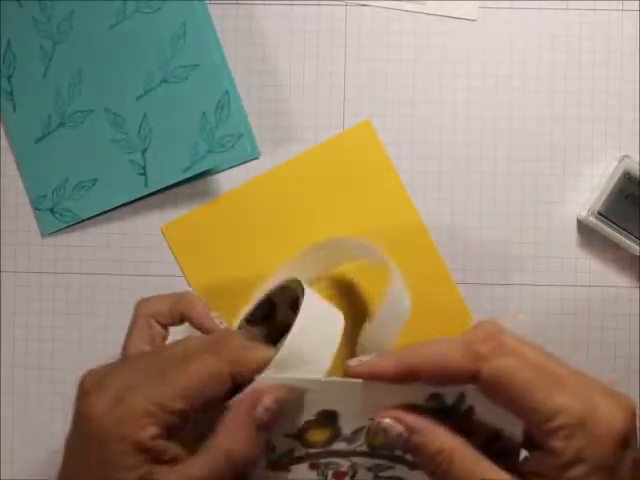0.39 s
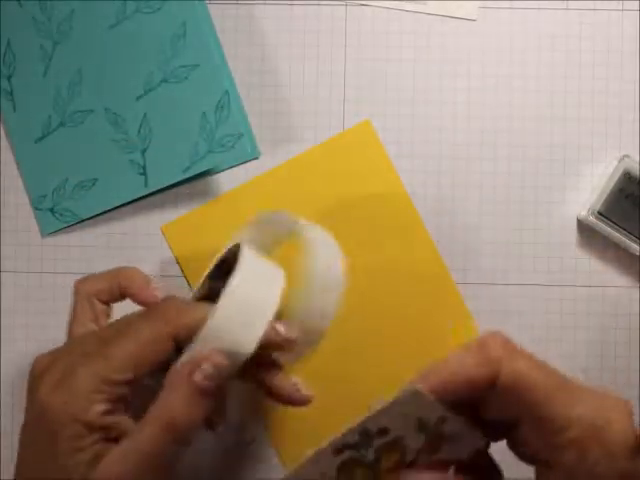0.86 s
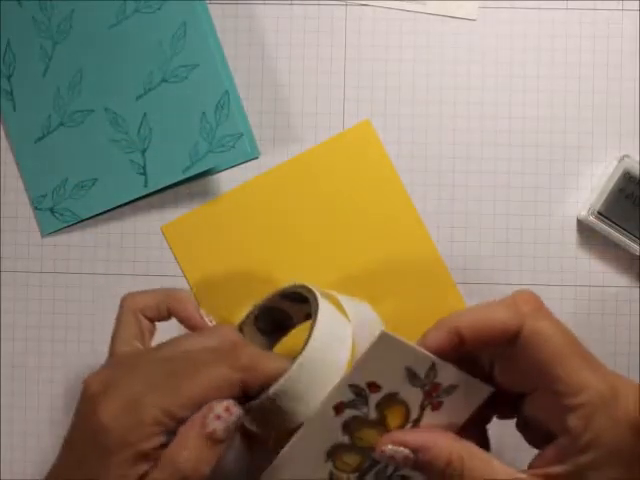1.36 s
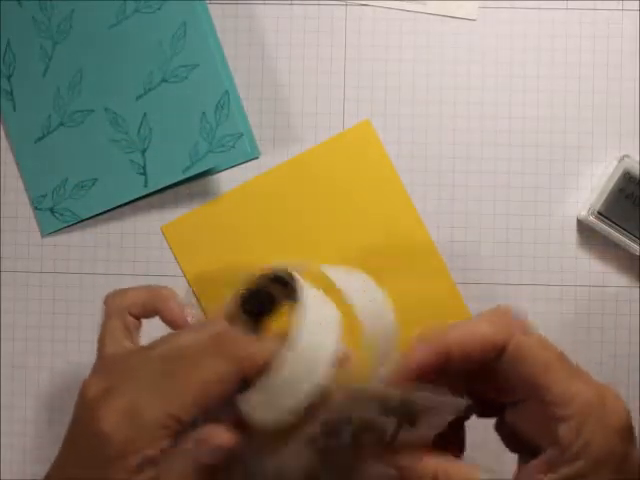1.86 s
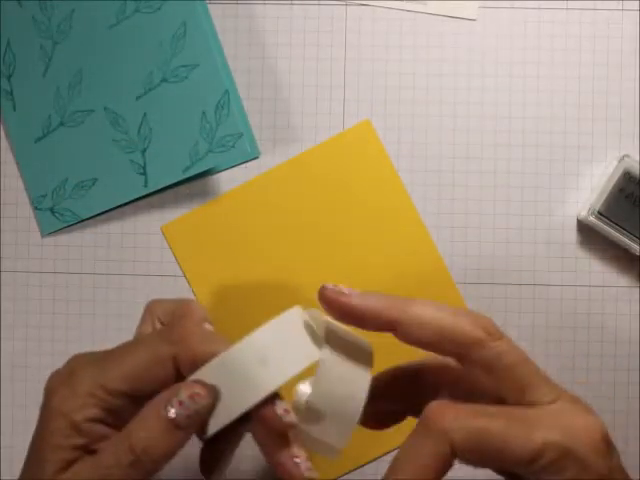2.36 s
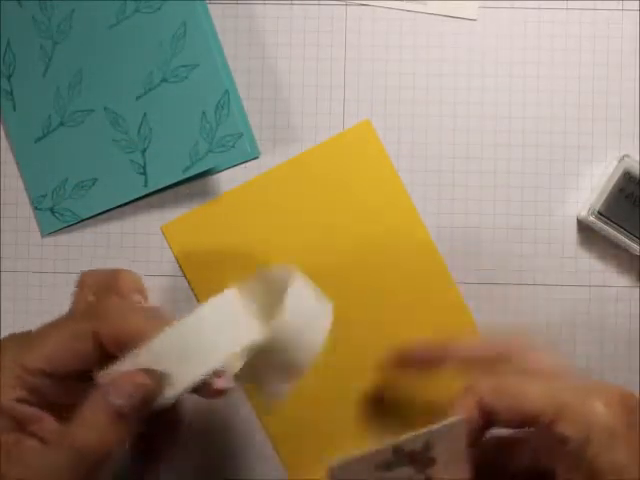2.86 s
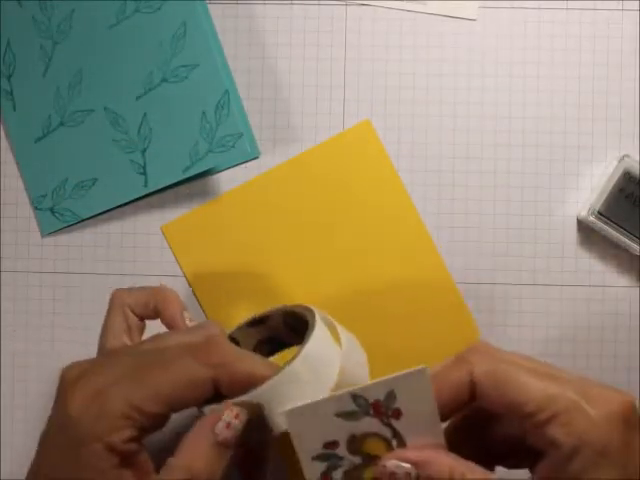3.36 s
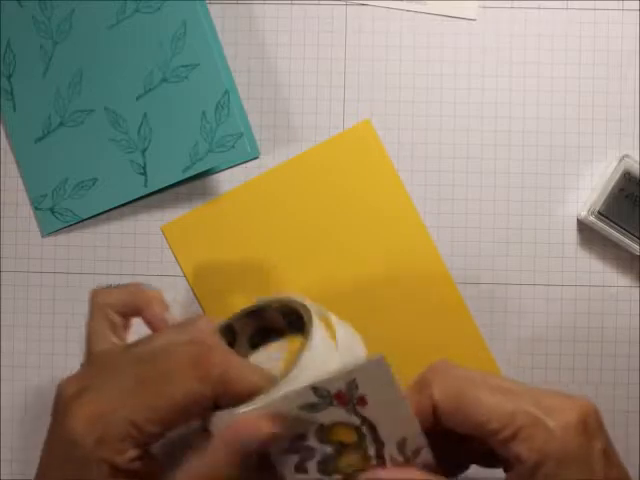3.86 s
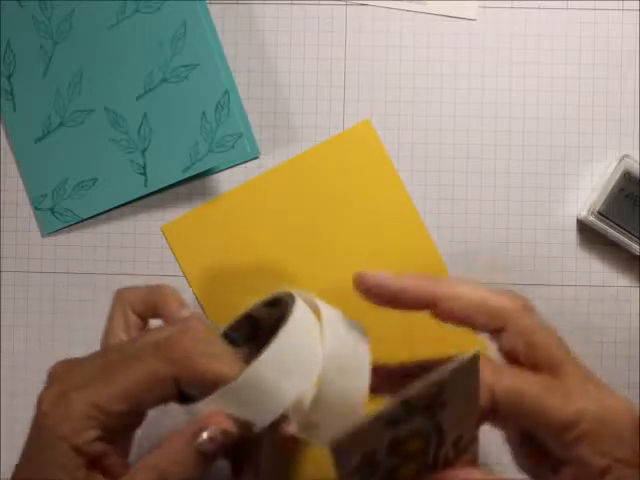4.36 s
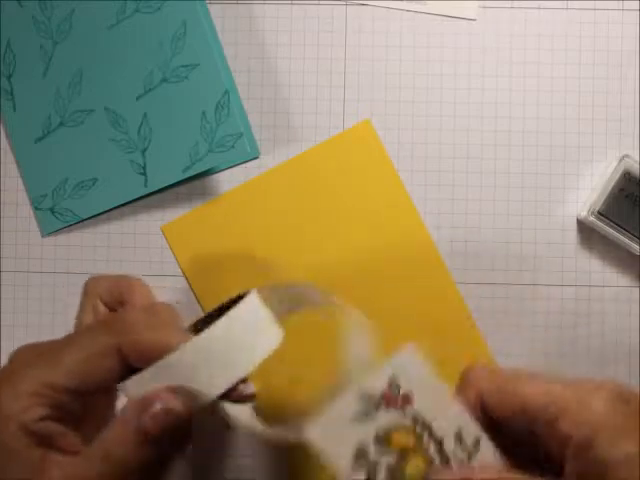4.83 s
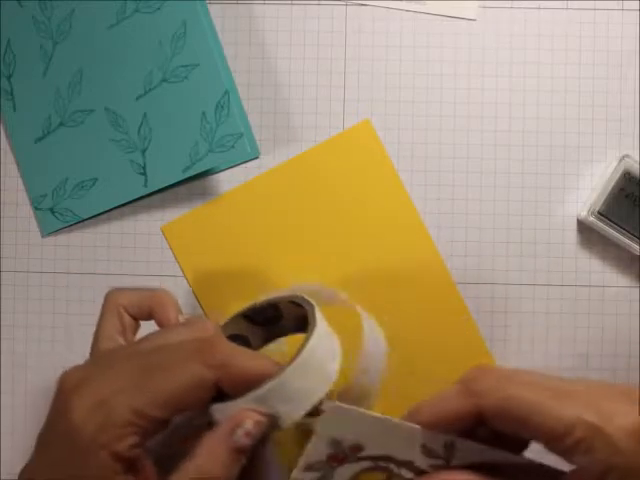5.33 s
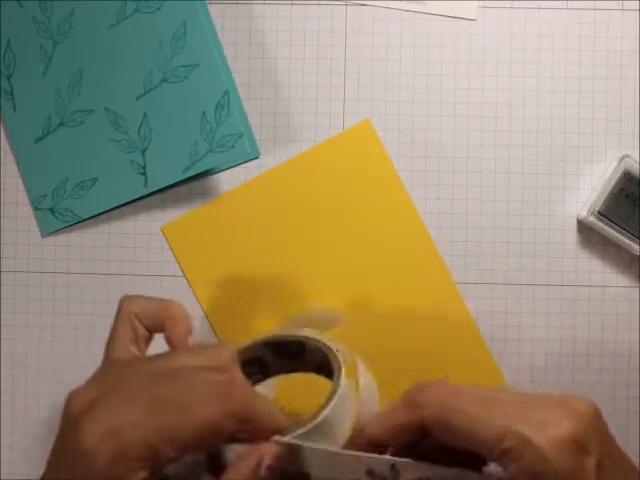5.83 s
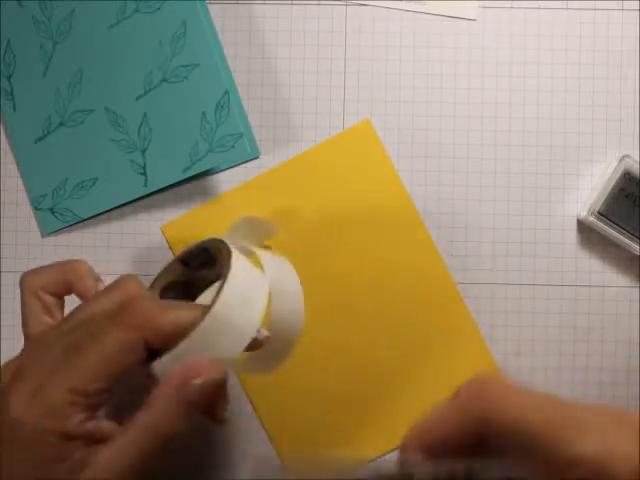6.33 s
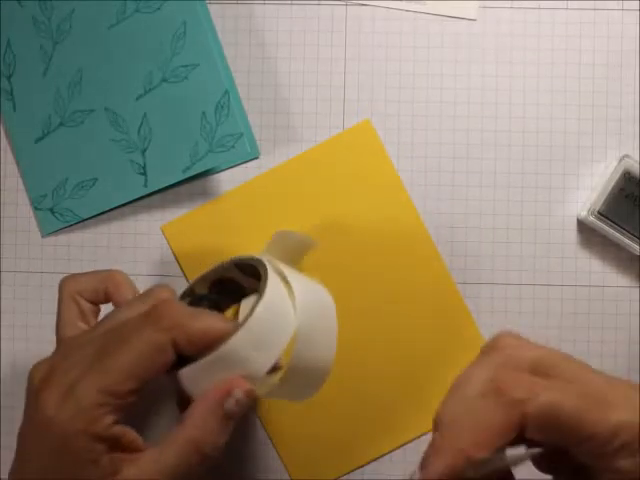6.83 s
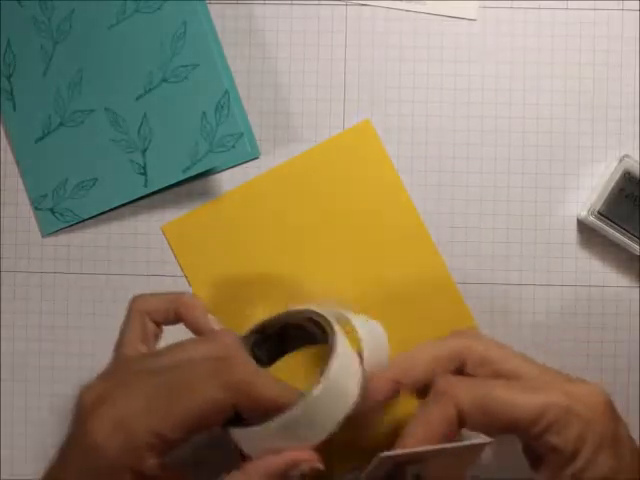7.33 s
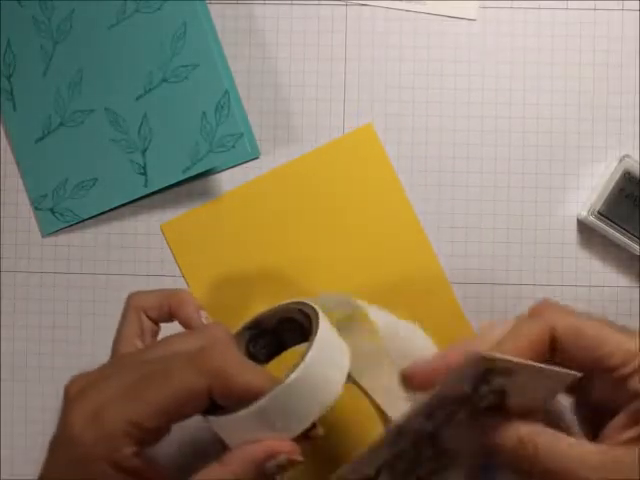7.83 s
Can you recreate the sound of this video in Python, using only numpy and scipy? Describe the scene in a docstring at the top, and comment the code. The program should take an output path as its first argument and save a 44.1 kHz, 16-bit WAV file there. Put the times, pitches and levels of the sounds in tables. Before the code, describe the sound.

Close to the microphone, hands press a small card onto sticky dots on a roll and pull it off. Irregular sharp snaps ring briefly through the stiff card, a few very loud, most faint. The springy backing strip adds tiny bright ticks and short papery rustles. The room is quiet, with soft hum and hiss.

```python
"""The soft hum and hiss of a quiet room, then hands press a card onto glue dots and pull it off again. Each dot
lets go with a snap: a short click, then decaying noise rung through the modes of the card. The loose backing
strip ticks as a fainter, brighter snap, and rustles in swells as random creases and hiss through paper-coloured
bands. Shaped noise and low resonances make the room."""
import sys
import numpy as np
from scipy import signal
from scipy.fft import rfft, irfft
from scipy.io import wavfile

SR = 44100
rng = np.random.default_rng(int(sys.argv[2]) if len(sys.argv) > 2 else 0)


def gain_from_decibels(decibels):
    """Convert decibel values to linear amplitude factors."""
    exponent = np.asarray(decibels, float) / 20
    return 10 ** exponent


def put_to_file(sound):
    """Save the sound as 16-bit audio at rate SR, in the file named by the first command-line argument."""
    columns = np.atleast_2d(sound).T  # one column per channel
    safe = np.clip(columns, -1, 1)
    whole_steps = np.round(safe * 32767)
    wavfile.write(sys.argv[1], SR, whole_steps.astype(np.int16))


N = 361179


def rms_one(x):
    """Scales x to rms 1."""
    return x / np.sqrt(np.mean(x ** 2) + 1e-20)


def in_time(rows):
    """Draws a curve of (t/s, level/dB) rows out to one value per sample."""
    s, level_db = np.transpose(rows)
    return np.interp(np.arange(N) / SR, s, level_db)


def coloured(x, spectrum):
    """Gives x the spectrum of an (f/Hz, level/dB) table, joined up along log frequency."""
    hz, db = np.transpose(spectrum)
    bins = np.maximum(np.fft.rfftfreq(len(x), 1 / SR), 1)
    gain = gain_from_decibels(np.interp(np.log(bins), np.log(hz), db))
    return irfft(rfft(x) * gain, len(x))


def drift(rate_hz):
    """Slow random wander of rms 1: noise through two equal low-pass poles, made at SR / 40."""
    r = np.exp(-80 * np.pi * rate_hz / SR)
    noise = rng.standard_normal(N // 40 + 2002)
    slow = signal.lfilter([1], [1, -2 * r, r * r], noise)[2000:]   # settled part only
    return np.interp(np.arange(N) / 40, np.arange(len(slow)), rms_one(slow))


def resonance(x, hz, width_hz):
    """Two-pole resonance with gain about 1 on top."""
    r = np.exp(-np.pi * width_hz / SR)
    top = (1 - r * r) / 2
    poles = [1, -2 * r * np.cos(2 * np.pi * hz / SR), r * r]
    return signal.lfilter([top, 0, -top], poles, x)


def cut(x, hz, kind):
    """Gentle low-, high- or band-pass."""
    return signal.sosfilt(signal.butter(2, hz, kind, fs=SR, output="sos"), x)


# glue dots letting go and the card knocking: t/s, level/dB, then levels/dB relative to that:
# knock of the roll, ring of the card, crack
SNAPS = [(0.428, -15.5, -14.5, -19.5, -21), (0.6512, -32, -20, -29, -14), (0.738, -6, -20, -19, -17.5),
         (0.7558, -24.5, -13, -32, -12), (0.8122, -29, -20, -18, -18), (1.6264, -22.5, -9, -15.5, -23),
         (1.8482, -31.5, -14, -21, -15), (1.9073, -2.3, -16, -12, -20.5), (2.6337, -25, -35, -35, -34),
         (2.681, -19.5, -20.5, -21.5, -12), (2.7981, -34, -34, -20, -9), (2.923, -25, -19, -17, -18),
         (2.944, -21, -28, -20, -15), (3.6425, -29.5, -12, -9.5, -15.5), (3.8755, -19.5, -27, -29.5, -23),
         (4.0032, -0.1, -23.5, -21.5, -22.5), (4.52, -30, -25, -21, -20), (4.562, -24.5, -37, -15, -25),
         (4.6833, -24.5, -27, -21.5, -16), (4.7407, -1, -37.5, -32.5, -23.5),
         (4.8023, -15, -23, -22.5, -17), (4.9384, -32, -13, -10.5, -14), (4.9577, -20.5, -24, -20, -15),
         (4.9967, -30.5, -18.5, -19, -20), (5.118, -6.5, -27.5, -19, -21.5), (5.234, -25, -22, -11, -21),
         (5.2613, -30, -31, -18, -22), (5.3059, -18, -31, -28, -22), (5.4022, -31.5, -22, -35, -11),
         (5.7525, -19.5, -13.5, -15.5, -24), (6.02, -28.5, -25, -24, -21.5), (6.1362, -14, -26, -24, -24),
         (6.1741, -19, -14.5, -17, -32), (6.192, -26.5, -9.5, -12.5, -18), (7.3416, -24, -31, -15.5, -15),
         (7.3603, -16.5, -20, -25, -25), (7.8627, -10.5, -27, -27, -19.5), (7.965, -18, -14, -18.5, -21),
         (7.983, -23.5, -29, -23, -13), (8.1279, -23.5, -18.5, -19.5, -25),
         (8.1535, -26.5, -29, -26, -16.5)]
# the springy strip ticking against roll and card: t/s, level/dB
TICKS = [(1.098, -35), (1.139, -44), (1.1697, -44), (1.7627, -44), (2.084, -41), (2.8265, -36.5),
         (3.243, -43), (3.336, -43.5), (4.195, -43.5), (4.844, -34.5), (5.075, -44), (5.3695, -40.5),
         (5.4656, -46), (5.8155, -38.5), (5.859, -41), (6.074, -41), (6.1053, -40), (6.3758, -40),
         (7.4231, -37), (7.4932, -42.5), (7.5393, -39), (7.5732, -32.5), (7.6897, -40), (7.7092, -36),
         (7.824, -38.5), (7.917, -34), (8.0267, -35.5)]
# make-up of every tick: knock, ring, crack [level/dB relative to the tick]
TICK_PARTS_DB = (-21, -18.5, -7.5)
# borders between thump, knock, ring and crack: f/Hz
PART_EDGES_HZ = [100, 650, 1700, 4000]


def snaps():
    """A sharp release, then a dense swarm of after-clicks and table echoes, the treble dying first."""
    t = np.arange(SR // 6) / SR
    out = np.zeros(N + len(t))
    click = release_click(t)
    ticks = [(*tick, *TICK_PARTS_DB) for tick in TICKS]
    for s, level_db, knock_db, ring_db, crack_db in SNAPS + ticks:
        parts_db = [knock_db - 4.5, knock_db, ring_db, crack_db]   # the thump follows the knock
        swarm = dying_swarm(t)
        body = card_body(swarm[:3])
        bands = zip(PART_EDGES_HZ, PART_EDGES_HZ[1:])
        parts = [cut(x, band, "band") for x, band in zip(body, bands)]
        parts.append(bright_crack(swarm[3], swarm[4]))
        first = SR // 50   # each part is levelled by its first 20 ms
        tail = sum(gain_from_decibels(db) * x / np.std(x[:first]) for x, db in zip(parts, parts_db))
        at = round(s * SR)
        out[at:at + len(t)] += gain_from_decibels(level_db) * (click * rng.choice([-1, 1]) + tail)
    return out[:N]


def release_click(t, click_hz=3500, peak_db=-2):
    """The glue lets go: one impulse through a very broad resonance."""
    click = resonance(1. * (t == 0), click_hz, 0.93 * click_hz)
    return gain_from_decibels(peak_db) * click / np.abs(click).max()


def dying_swarm(t, t60_s=0.097, early_s=0.0075, early_db=2.5, strike_db=26.5):
    """Five decaying noises, from thump up to the top treble, with a little extra level at the start."""
    lengths_s = t60_s * np.array([[1.3], [1.15], [1], [.9], [.85]])
    dying = gain_from_decibels(-60 * t / lengths_s + early_db * np.exp(-t / early_s))
    swarm = dying * rng.standard_normal(dying.shape)
    swarm[:3, 0] = gain_from_decibels(strike_db)   # the release itself strikes all modes at once
    return swarm


# resonances of card and roll: f/Hz, width/Hz, level/dB
CARD = [(200, 52, -36), (435, 98, -2), (565, 69, -2), (842, 130, 9.5), (1037, 107, 3.5), (1173, 78, 6),
        (1340, 230, 5.5), (1660, 190, 6.5), (2020, 340, 3), (2384, 270, 3.5), (2740, 235, 4),
        (3057, 140, 5.5), (3377, 200, 1.5), (3880, 890, -4)]


def card_body(swarm, spread_db=1.5, broad_db=-12.0):
    """Card and roll ring in their modes; countless small modes fill the gaps."""
    strengths = gain_from_decibels(spread_db * rng.standard_normal(len(CARD)))   # the card is held differently each time
    body = gain_from_decibels(broad_db) * swarm
    for k, (hz, width_hz, db) in enumerate(CARD):
        body = body + (-1) ** k * gain_from_decibels(db) * strengths[k] * resonance(swarm, hz, width_hz)
    return body


# spectrum of the crack: f/Hz, level/dB per Hz
CRACK = [(3000, -15), (4200, -8), (6000, -11), (9000, -14.5), (13000, -19), (16000, -11.5)]


def bright_crack(treble, top_treble):
    """The crack: two noises of different decay meet near 8 kHz and share one spectrum."""
    both = cut(treble, 7600, "low") + cut(top_treble, 8600, "high")
    return cut(coloured(both, CRACK), PART_EDGES_HZ[-1], "high")


# spectrum of the waxed paper: f/Hz, level/dB per Hz
PAPER = [(180, -27), (300, -10), (915, -6.5), (1010, -11), (1100, -5), (1390, -13.5), (1750, -7),
         (3400, -10), (16000, -18.5)]


def rustle(patchy_db=1.3):
    """Waxed paper creasing and rustling; each band comes in patches partly of its own."""
    bright_gain, dull_gain = swell_gains()
    paper = coloured(creased_sheet(), PAPER)
    edges_hz = [200, 1200, 3000, 5000, 8000, 12000, 18000]
    together = drift(60)
    bands = []
    for k, band_hz in enumerate(zip(edges_hz, edges_hz[1:])):
        patches = gain_from_decibels(patchy_db * (together + drift(35)))
        # neighbours meet in opposite phase, so their signs alternate
        bands.append((-1) ** k * cut(paper, band_hz, "band") * patches)
    dull, bright = sum(bands[:2]), sum(bands[2:])
    return (bright_gain * bright + dull_gain * dull) / np.std(bright)


def creased_sheet(per_s=3000.0, size_db=2.5, smooth_db=1.5, flecks_per_s=120.0, fleck_db=-6.5):
    """Random micro-crease impulses over smooth hiss, with small panels popping now and then."""
    sizes = gain_from_decibels(size_db * np.minimum(rng.exponential(1, N), 4)) * rng.choice([-1, 1], N)
    creases = rms_one(sizes * (rng.random(N) < per_s / SR))
    # each popping panel rings for a few milliseconds at one of 16 pitches
    popped = sizes * (rng.random(N) < flecks_per_s / SR)
    panel = rng.integers(0, 16, N)
    pitches_hz = np.geomspace(1200, 9000, 16)
    flecks = sum(resonance(popped * (panel == k) + 1e-18, hz, 97.0) for k, hz in enumerate(pitches_hz))
    hiss = gain_from_decibels(smooth_db) * rng.standard_normal(N)
    return creases + hiss + gain_from_decibels(fleck_db) * rms_one(flecks)


# swells of hiss, mostly the paper rustling, though those at 3.006, 4.715 and 4.802 s are brief flat bursts of
# hiss: t/s of full level, hold/s, bright level/dB, dull level/dB relative to it
SWELLS = [(0.453, 0.099, -54, -7), (0.643, 0.063, -48, -4), (0.764, 0.17, -56, -10),
          (0.942, 0.019, -46.5, -11), (1.1, 0.051, -52.5, -3.5), (1.86, 0.094, -52.5, -14),
          (2.523, 0.0057, -50, -7), (2.699, 0.02, -40, -4.5), (2.797, 0.034, -44, -5),
          (3.006, 0.016, -51.5, 2.5), (3.954, 0.11, -53, -9), (4.248, 0.066, -56.5, -20),
          (4.535, 0.059, -53.5, 1), (4.715, 0.068, -43, -7.5), (4.802, 0.031, -43, -8),
          (4.986, 0.084, -52.5, -6), (5.114, 0.022, -37, 0.5), (5.155, 0.017, -52, 10),
          (5.243, 0.035, -51, 6), (6.282, 0.0081, -48, -6), (6.317, 0.019, -51, -13),
          (6.404, 0.053, -53, 3.5), (6.57, 0.17, -54, -10), (7.264, 0.048, -50.5, 2),
          (7.334, 0.041, -38.5, -5), (7.39, 0.069, -51, 0.5), (7.54, 0.075, -49.5, -14),
          (7.853, 0.016, -43.5, -29), (7.941, 0.032, -41.5, -8.5), (8.02, 0.17, -54.5, 4)]
# light handling between the swells: t/s, bright level/dB
HANDLING = [(0, -65), (0.35, -60), (1.2, -58.5), (1.4, -61), (1.7, -58), (2.1, -57), (2.4, -64.5),
            (2.9, -61), (3.3, -60), (3.8, -57.5), (4.4, -64), (5.5, -57.5), (6.1, -53.5), (6.9, -57),
            (7.15, -61.5), (7.7, -58.5), (8.19, -74)]


def swell_gains(rise_db_per_s=441, fall_db_per_s=286, handling_dull_db=-4):
    """Bright and dull rustle gains: swells rise, hold and fall, adding in power to the handling."""
    t = np.arange(N) / SR
    handling_db = in_time(HANDLING)
    bright = gain_from_decibels(2 * handling_db)
    dull = gain_from_decibels(2 * (handling_db + handling_dull_db))
    for s, hold_s, db, dull_db in SWELLS:
        before_s, after_s = np.maximum(s - t, 0), np.maximum(t - s - hold_s, 0)
        away_db = rise_db_per_s * before_s + fall_db_per_s * after_s
        power = gain_from_decibels(2 * (db - np.minimum(away_db, 60)))
        bright = bright + power
        dull = dull + power * gain_from_decibels(2 * dull_db)
    return np.sqrt(bright), np.sqrt(dull)


# spectrum of ventilation and microphone hiss: f/Hz, level/dB (relative)
ROOM_TONE = [(15, -27), (25, -7.5), (117, -10), (180, -9.5), (236, -10), (344, -5.5), (476, -13.5),
             (560, -6.5), (677, -13), (796, -11), (1330, -14), (1740, -13.5), (8590, -31.5), (14800, -33.5),
             (16000, -16)]


def room_tone(level_db=-52.5):
    """Distant ventilation noise and microphone hiss: steady noise in one fixed spectrum."""
    return gain_from_decibels(level_db) * rms_one(coloured(rng.standard_normal(N), ROOM_TONE))


# low resonances of the room: f/Hz, width/Hz, level/dB (rms; the lowest also swells)
BOOMS = [(53.3, 25, -59.5), (176.8, 11, -67.5), (360, 20, -72), (560.3, 37, -68), (783, 57, -70.5)]
# swell and fade of the lowest boom: t/s, level/dB (only the departure from its mean counts)
BOOM_SWELL = [(0.0, -60), (0.7, -58), (1.6, -63), (2.1, -63.5), (3.7, -60.5), (5.1, -64), (5.8, -61),
              (6.9, -60), (7.8, -61), (8.19, -63)]


def room_booms():
    """A few low room resonances stand out: noise passed twice through each of them."""
    swell_db = in_time(BOOM_SWELL)
    out = np.zeros(N)
    for k, (hz, width_hz, db) in enumerate(BOOMS):
        once = resonance(rng.standard_normal(N), hz, width_hz)
        boom = gain_from_decibels(db) * rms_one(resonance(once, hz, width_hz))
        if k == 0:
            boom = boom * gain_from_decibels(swell_db - np.mean(swell_db))
        out += boom
    return out


def scene():
    """Everything close to one microphone."""
    return (snaps() + rustle() + room_tone() + room_booms())[None]


def band_limit(x):
    """A steep low-pass at the top of the band."""
    return signal.sosfilt(signal.butter(12, 17110, fs=SR, output="sos"), x)


def record(dry):
    """The top is cut steeply, the deepest bass gently, and peaks stop at full scale."""
    steep = signal.cheby2(12, 40, 15780 * 1.025, fs=SR, output="sos")   # 40 dB down from that edge in Hz
    x = signal.sosfilt(steep, dry)
    x = cut(x, 39.5, "high")
    return band_limit(np.clip(x, -1, 1))


dry = scene()
out = record(dry)
put_to_file(out)
```